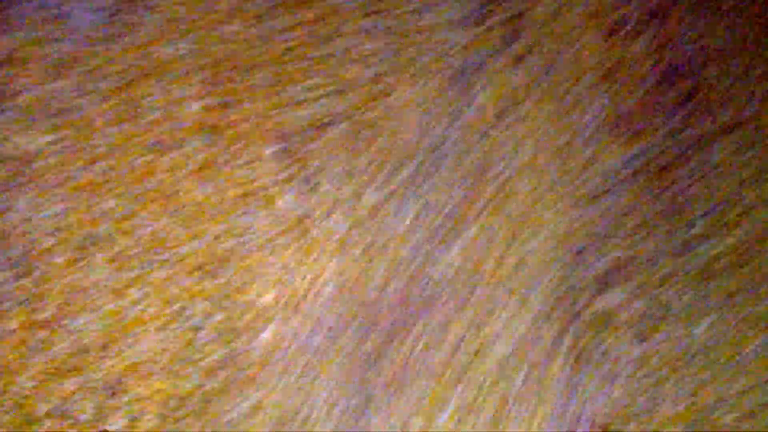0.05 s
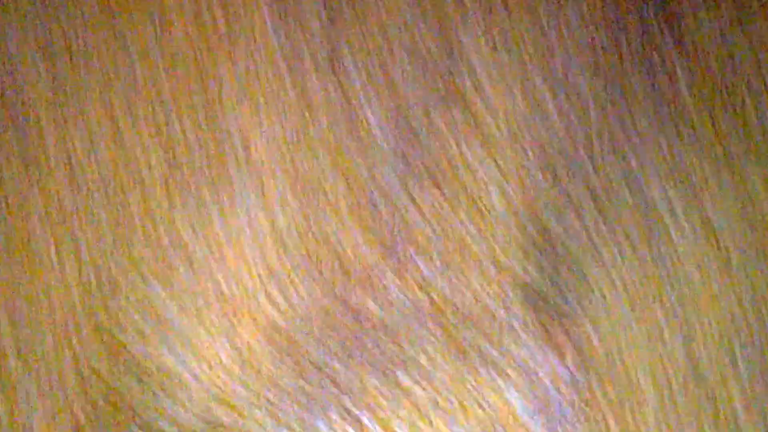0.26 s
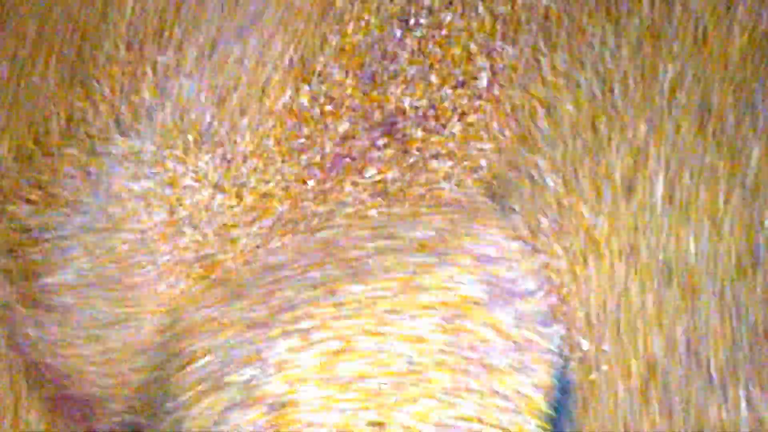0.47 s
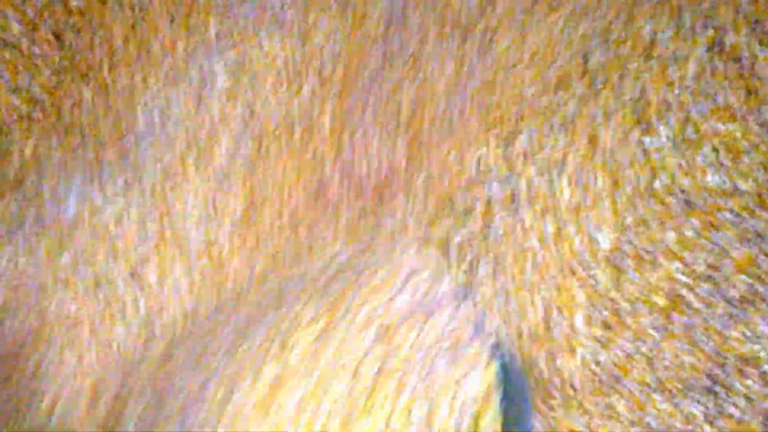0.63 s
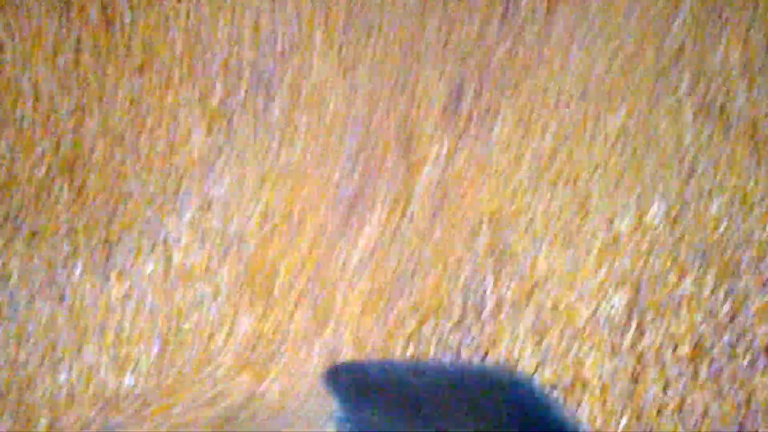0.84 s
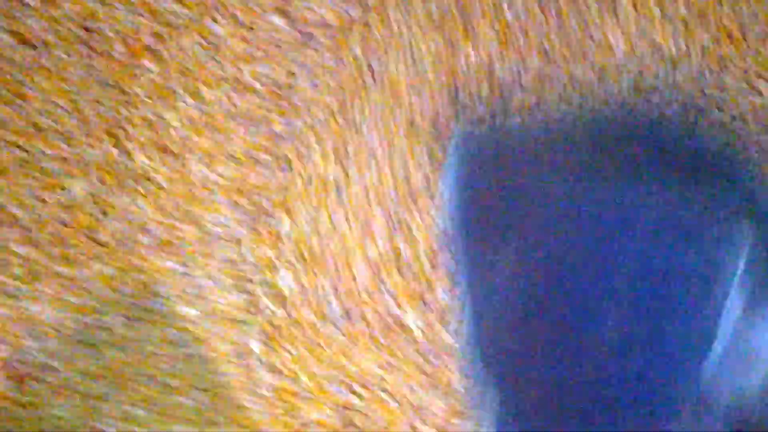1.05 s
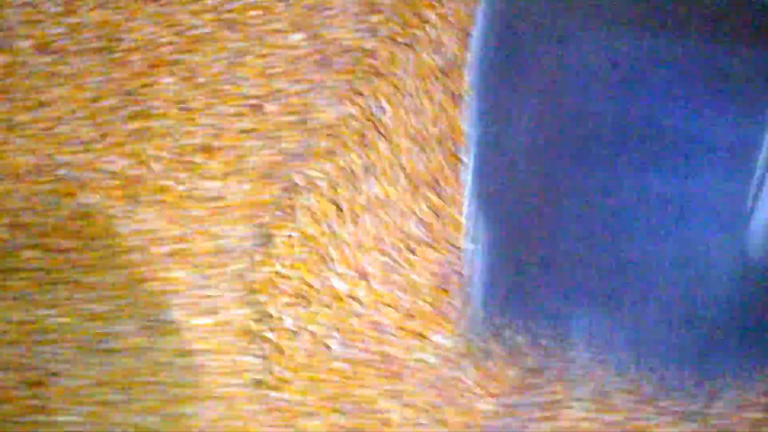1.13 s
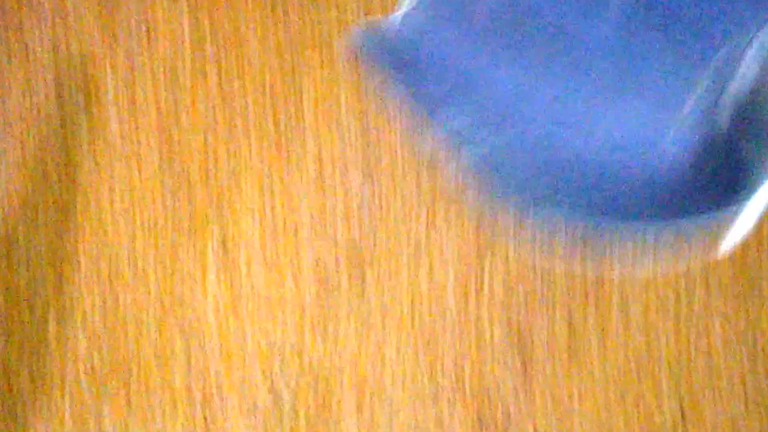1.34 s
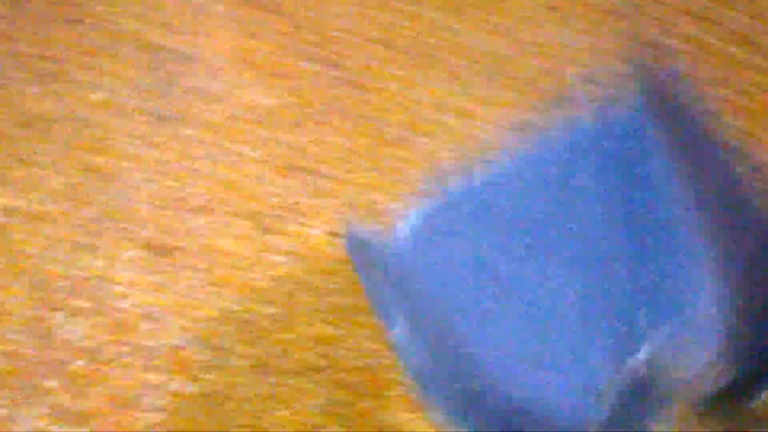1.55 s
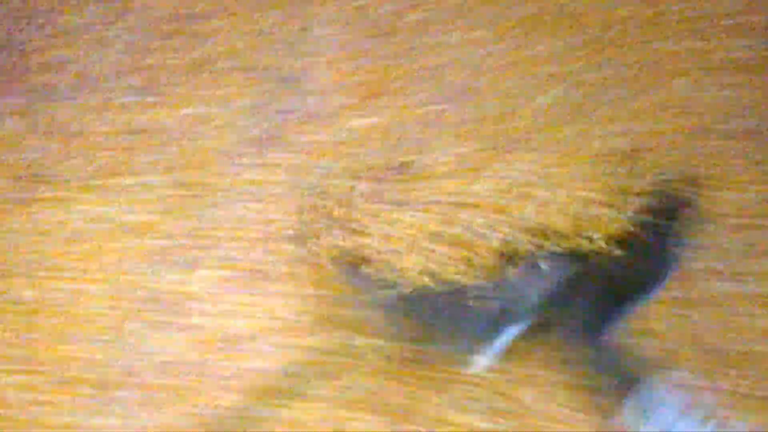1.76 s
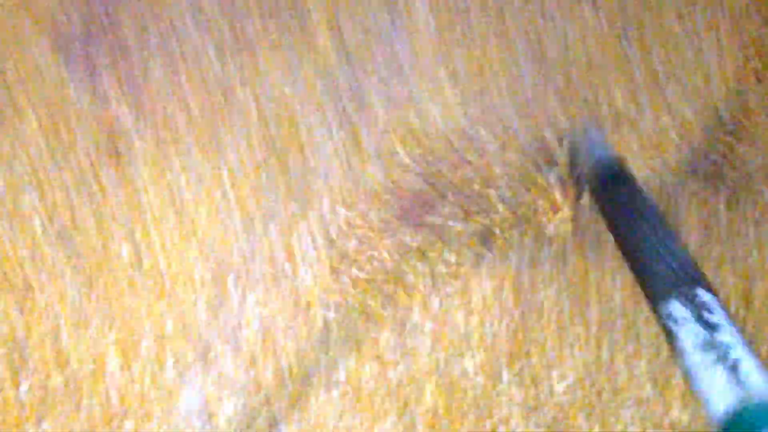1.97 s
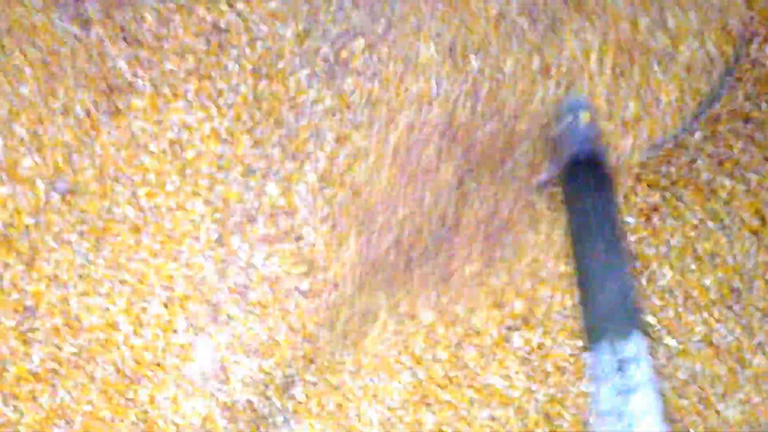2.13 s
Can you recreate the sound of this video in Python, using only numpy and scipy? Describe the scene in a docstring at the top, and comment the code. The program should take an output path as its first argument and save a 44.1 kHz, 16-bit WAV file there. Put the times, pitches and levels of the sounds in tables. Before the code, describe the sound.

A shovel scrapes through grain in a bin, the hiss of kernels building until the blade comes free, ringing lightly. It then plunges in again with a loud clunk and a short swish, while a fan rushes steadily behind.

```python
"""A steel shovel works loose grain inside a bin, over a steady rush like that of a ventilation fan.
Kernels trickle, then slide ever faster along the blade, which sings faintly and clunks.
The blade rings on as it comes free, and a few stray kernels flick the steel.
It stabs back in with a clash and a clunk and swishes down through the kernels.
A mono recorder ducks under the stab and recovers slowly."""
import sys
import numpy as np
from scipy import signal
from scipy.fft import rfft, irfft, next_fast_len
from scipy.io import wavfile
from scipy.ndimage import uniform_filter1d, map_coordinates

SR = 44100
rng = np.random.default_rng(int(sys.argv[2]) if len(sys.argv) > 2 else 0)


def to_wav(s):
    """Save 16-bit WAV."""
    ch = np.atleast_2d(s).T  # columns
    pcm = np.round(np.clip(ch, -1, 1) * 32767)  # PCM
    wavfile.write(sys.argv[1], SR, pcm.astype(np.int16))


N = 97020

# modes of the free blade (frequency [Hz], level [dB], t60 [s])
BLADE_MODES = [(834.2, -11, 0.77), (902, -20, 0.99), (1281, -14, 0.84), (2318, -9, 0.38), (2390, -3, 0.19),
               (2750, 1, 0.23), (3090, -17, 0.2), (3301, -4, 0.51), (3580, -7, 0.12), (3755, 0, 0.18),
               (4460, -5, 0.13), (5530, -4, 0.12), (6180, -2.5, 0.081), (7350, -14, .1)]
# colour of grain on steel (frequency [Hz], level [dB])
GRAIN_ON_STEEL = [(60, -63), (230, -11.5), (520, -22), (1000, -13.5), (2000, -4.5), (3000, 2), (4200, -3),
                  (6100, -1.5), (7500, -3), (8900, -13.5), (12000, -15), (15000, -19)]
# the blade's edge stabs the heap (time [s], level [dB], hold [s], t60 [s])
STAB_HITS = [(1.7033, -3.5, 0.0087, 0.053), (1.7237, -8, 0.0033, 0.014)]


def amp(db):
    """Decibels to gain."""
    return 10 ** (np.asarray(db) / 20)


def unit(x):
    """Scale to rms 1."""
    return x / np.sqrt(np.mean(x ** 2) + 1e-20)


def clock():
    """The time of every sample, in seconds."""
    return np.arange(N) / SR


def fader(points):
    """Gain riding along (time [s], level [dB]) points."""
    return amp(np.interp(clock(), *np.transpose(points)))


def wobble(rate):
    """A smooth random curve, rate knots a second."""
    return map_coordinates(rng.standard_normal(N // 100), [clock() * rate + 2], mode="wrap")


def coloured(x, points):
    """Minimum-phase EQ of unit energy, drawn through (frequency [Hz], level [dB]) points."""
    size = 2 * next_fast_len(N)
    hz, db = np.transpose(points)
    log_hz = np.log(np.fft.rfftfreq(size, 1 / SR) + 1)
    gain = unit(amp(np.interp(log_hz, np.log(hz), db)))
    cepstrum = irfft(np.log(gain), size)
    cepstrum[1:size // 2] *= 2  # folded, so nothing rings ahead of a hit
    cepstrum[size // 2 + 1:] = 0
    return irfft(rfft(x, size) * np.exp(rfft(cepstrum)), size)[:N]


def kernels(per_s, spread_db):
    """Tiny impacts of random size at random moments."""
    hits = rng.random(N) < per_s / SR
    polarity = rng.choice([-1, 1], N)
    sizes = amp(spread_db * np.clip(rng.standard_normal(N), -2, 2))
    return unit(hits * polarity * sizes)


def burst(start, t60, hold=0, attack=0.00021):
    """Envelope of a blow: quick rise, hold, steady decay; all times in seconds."""
    age = np.maximum(clock() - start, 0)
    return (1 - np.exp(-age / attack)) * np.exp(-np.log(1000) * np.maximum(age - hold, 0) / t60)


def tone(hz, width_hz):
    """A sine whose pitch wanders over roughly width_hz."""
    pitch = hz + width_hz / 2 * wobble(np.clip(2 * width_hz, 5, 400))
    return np.sin(2 * np.pi * (np.cumsum(pitch) / SR + rng.random()))


def fan():
    """A steady bed of rushing air with a thin, wavering whine."""
    # colour of the air (frequency [Hz], level [dB])
    air_colour = [(30, -37), (60, -33), (95, -15), (140, 0.5), (190, 2.5), (330, 1.5), (520, -6.5),
                  (800, -3), (1050, -6), (1600, -0.5), (3400, 0.5), (4300, -5.5), (7000, -9), (9400, -11.5),
                  (12000, -8.5), (15000, -11)]
    rush = amp(-28) * coloured(rng.standard_normal(N), air_colour)
    whine = amp(-42 + 1.5 * wobble(11)) * tone(hz=831, width_hz=6.77)
    return rush + whine


def trickle():
    """Kernels roll over each other in a fine, fluttering hiss."""
    # swell of the shifting grain (time [s], level [dB])
    swell = [(0, -54), (.2, -33), (.32, -28), (.55, -25.5), (.72, -24), (1.04, -18.5), (1.11, -33),
             (1.3, -30.5), (1.42, -35.5), (1.58, -31), (1.7, -33), (1.98, -33), (2.2, -35.5)]
    # colour of grain on grain (frequency [Hz], level [dB])
    hiss_colour = [(60, -51.5), (170, -3), (300, -8.5), (520, -11.5), (1100, -4), (1800, 0), (3300, -0.5),
                   (4200, -8.5), (7300, -8), (9300, -14), (12000, -7), (15000, -10.5)]
    flutter = amp(0.7 * wobble(45))
    return coloured(kernels(per_s=14000, spread_db=3), hiss_colour) * fader(swell) * flutter


def scrape():
    """Clumps of kernels rub along the blade and set its modes singing."""
    # push of the grain along the blade (time [s], level [dB])
    stroke = [(.55, -80), (.68, -40), (.76, -28.5), (.82, -23), (.875, -16), (.905, -10), (.932, -14),
              (.95, -10), (.978, -15.5), (1.005, -10), (1.06, -15), (1.078, -32), (1.16, -80)]
    push = fader(stroke) * amp(1.04 * wobble(170))
    rub = coloured(push * kernels(per_s=7000, spread_db=4.5), GRAIN_ON_STEEL)
    drive = push * kernels(per_s=7000, spread_db=4.5)
    t, sing = clock(), np.zeros(N)
    for hz, db, t60 in BLADE_MODES:
        mode = np.cos(2 * np.pi * hz * t) * np.exp(-np.log(1000) * t / t60)
        sing += amp(db) * unit(signal.fftconvolve(drive, mode)[:N])
    return rub + amp(-6.5) * np.std(rub) * unit(sing)


def clunks():
    """The shovel knocks: short, dry bursts of noise, each peaking at its own pitch."""
    # knocks of the shovel (time [s], level [dB], pitch [Hz])
    knocks = [(0.886, -12, 1410), (0.9446, -10, 3080), (0.951, -11, 3100), (1.564, -31, 1100),
              (1.724, -2, 1450), (2.083, -26, 1407)]
    # colour of a knock (frequency [multiple of its pitch], level [dB])
    knock_colour = [(.05, -42), (.25, -17), (.65, -14), (1, 3.5), (1.4, -13), (2.4, -13), (6, -30)]
    track = np.zeros(N)
    for start, db, hz in knocks:
        hit = amp(db) * burst(start, t60=0.014, hold=0.0023) * rng.standard_normal(N)
        track += coloured(hit, [(ratio * hz, gain_db) for ratio, gain_db in knock_colour])
    return track


def thuds():
    """Pushes on the heap give a dull, soft-edged low end."""
    # pushes on the heap (time [s], level [dB])
    pushes = [(0.886, -18.5), (1.562, -36)]
    envelope = sum(amp(db) * burst(start, t60=0.08, attack=0.0043) for start, db in pushes)
    return envelope * tone(hz=255.6, width_hz=60)


def ring_out():
    """Jolted as it lifts out of the heap, the blade rings on; its low modes last longest."""
    return amp(-23.5) * sum(amp(db) * burst(start=0.97, t60=t60, attack=0.0036) * tone(hz, width_hz=4.04)
                            for hz, db, t60 in BLADE_MODES)


def flicks():
    """Single kernels strike the steel harder than the rest, in bright ticks."""
    # kernel strikes (time [s], level [dB])
    strikes = [(0.999, -24), (1.029, -1), (1.0514, -7), (1.058, -8)]
    envelope = sum(amp(db) * burst(start, t60=0.02) for start, db in strikes)
    return coloured(envelope * rng.standard_normal(N), GRAIN_ON_STEEL)


def stab():
    """The edge hits many kernels at once, twice; the heap smothers the clash."""
    # colour of the clash (frequency [Hz], level [dB])
    clash_colour = [(60, -31), (250, -8.5), (800, -18), (1400, -13), (2200, -10), (2750, -4.5), (3300, -1),
                    (4200, -7.5), (6200, -7), (7100, -2.5), (8100, -1.5), (9500, -12.5), (12500, -9.5),
                    (15000, -8.5)]
    blows = sum(amp(db) * burst(start, t60, hold) for start, db, hold, t60 in STAB_HITS)
    return coloured(blows * kernels(per_s=18000, spread_db=0), clash_colour)


def plunge():
    """The buried blade swishes on through the kernels, then comes to rest."""
    # colour of the swish (frequency [Hz], level [dB])
    swish_colour = [(100, -49), (420, -23), (650, -11.5), (850, -16), (1600, -6), (2300, -7), (2750, 0.5),
                    (3550, -1), (4200, -6.5), (5600, -3), (8200, -2), (9900, -10.5), (13000, -9),
                    (15000, -11)]
    start_s, attack_s, hold_s = 1.714, 0.048, 0.08
    rise_db, fall_db_per_s = 14, 187
    age = clock() - start_s
    rise = rise_db * np.minimum(age / attack_s - 1, 0)
    fall = fall_db_per_s * np.maximum(age - attack_s - hold_s, 0)
    swish = coloured(kernels(per_s=18000, spread_db=4.5), swish_colour)
    buried = clock() > STAB_HITS[0][0]
    return swish * buried * amp(-9 + rise - fall + 1.1 * wobble(130))


def bin_echo(x):
    """The bin's walls throw back a short tail, damped by the grain."""
    tail = rng.standard_normal(N) * burst(start=0.0052, t60=0.18)
    return signal.fftconvolve(x, tail / np.linalg.norm(tail))[:N]


def scene():
    """The shovel and its echo over a bed of fan and grain, the same in both channels."""
    bed = fan() + trickle()
    shovel = scrape() + clunks() + thuds() + ring_out() + flicks() + stab() + plunge()
    mono = bed + shovel + amp(-19) * bin_echo(shovel)
    return np.array([mono, mono])


def record(dry):
    """Gain control ducks fast and recovers slowly; peaks are rounded off and the top is cut."""
    threshold_db, duck_slope, recover_db_per_s = -12.5, 0.6, 8.5
    ceiling, top_hz = 0.95, 15320
    power = np.abs(uniform_filter1d(dry[0] ** 2, size=441, origin=220))  # over the last 10 ms
    over_db = np.maximum(10 * np.log10(power + 1e-12) - threshold_db, 0)
    recovery_db = recover_db_per_s * clock()
    duck_db = np.maximum.accumulate(duck_slope * over_db + recovery_db) - recovery_db
    ducked = dry * amp(-duck_db)
    rounded = ducked / (1 + np.abs(ducked / ceiling) ** 6) ** (1 / 6)
    return irfft(rfft(rounded) * (np.fft.rfftfreq(N, 1 / SR) < top_hz), N)


dry = scene()
out = record(dry)
to_wav(out)
```